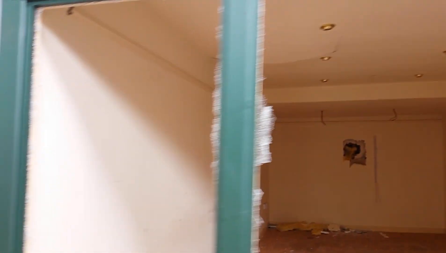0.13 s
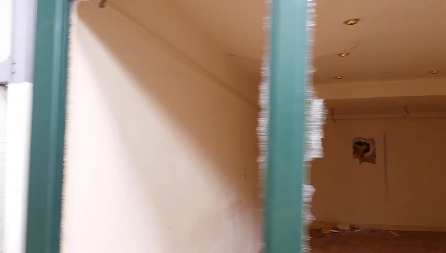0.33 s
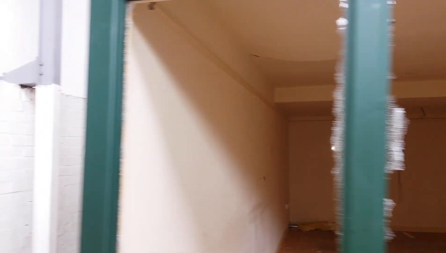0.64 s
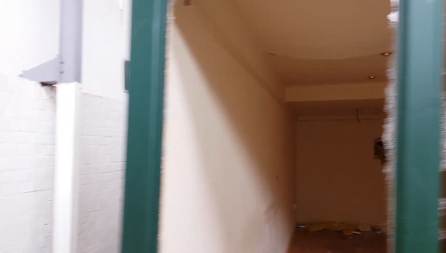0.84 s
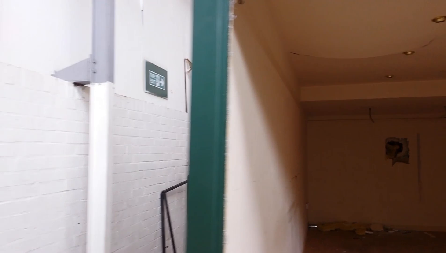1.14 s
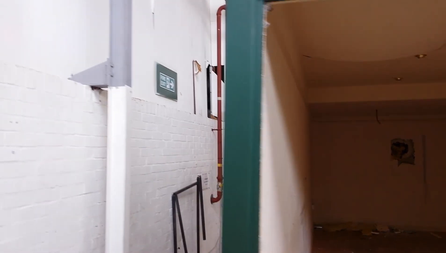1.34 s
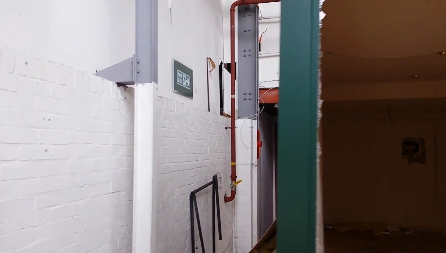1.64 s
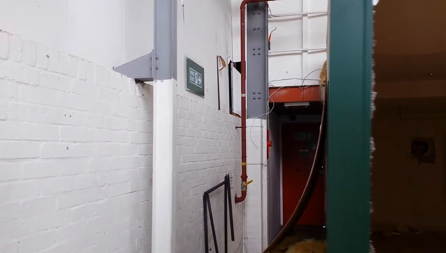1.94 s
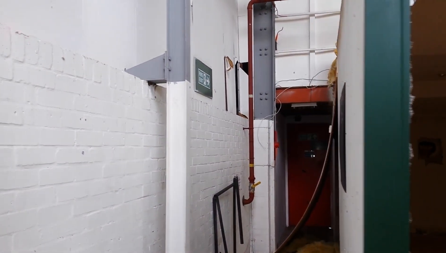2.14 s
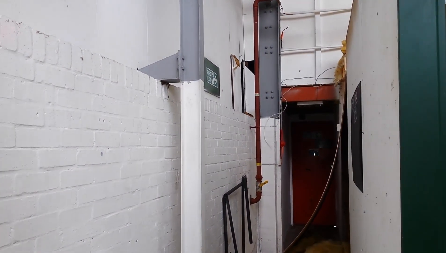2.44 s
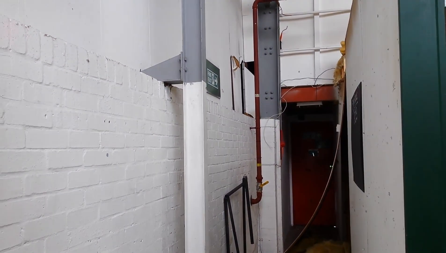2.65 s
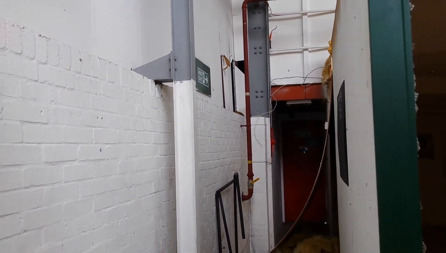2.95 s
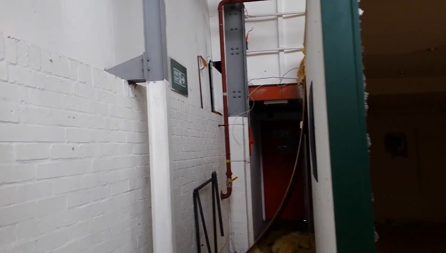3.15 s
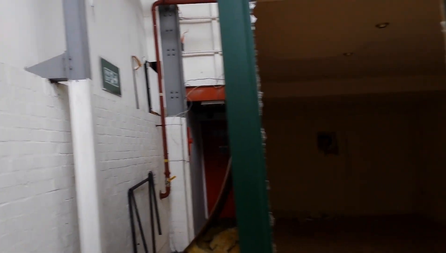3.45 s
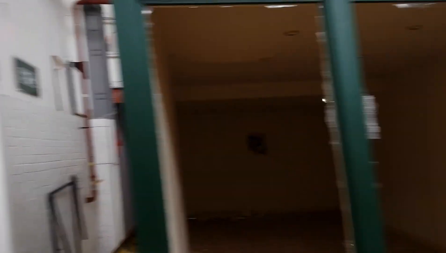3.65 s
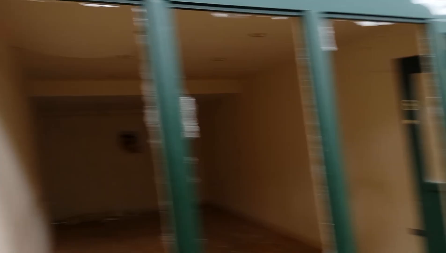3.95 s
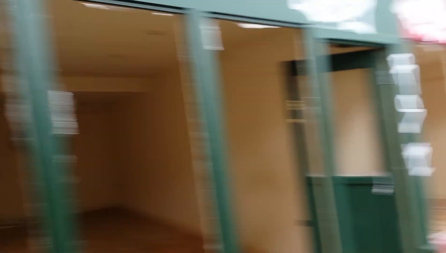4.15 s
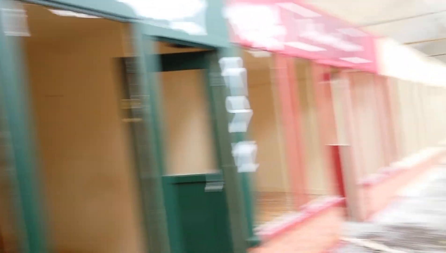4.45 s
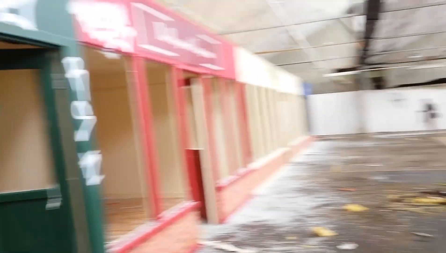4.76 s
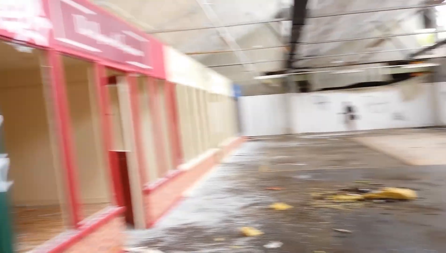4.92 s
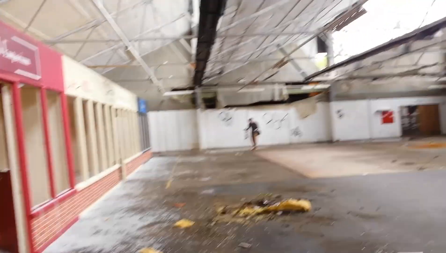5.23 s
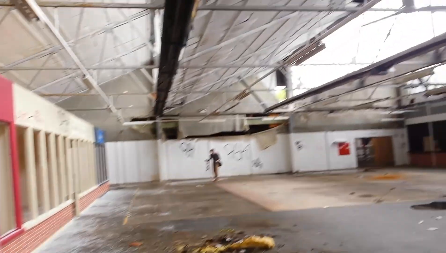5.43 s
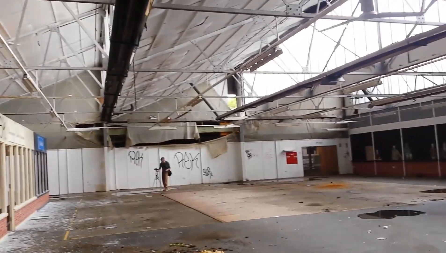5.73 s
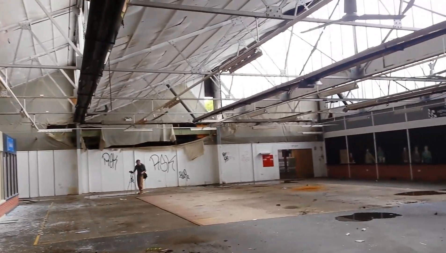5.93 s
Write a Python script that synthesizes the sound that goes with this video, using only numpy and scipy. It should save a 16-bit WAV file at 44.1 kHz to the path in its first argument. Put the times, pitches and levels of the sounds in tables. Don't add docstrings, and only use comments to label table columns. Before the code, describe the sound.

Someone walks slowly over grit and broken glass, heard from a handheld camera. Heavy crunching opens, a hollow heel thud with glassy ring follows, then grinding, a boomy step, two hard cracks, and a sparser ending of small clinks and ticks. The bare hall answers with a bright, diffuse echo over soft hiss and hand rumble.

```python
import sys
import numpy as np
from scipy import signal
from scipy.fft import rfft, irfft, next_fast_len
from scipy.io import wavfile
from scipy.ndimage import uniform_filter1d

SR = 44100
rng = np.random.default_rng(int(sys.argv[2]) if len(sys.argv) > 2 else 0)


def log_audio(samples):
    frames = np.atleast_2d(samples).T
    limited = np.clip(frames, -1, 1)
    pcm = np.round(limited * 32767).astype(np.int16)
    wavfile.write(sys.argv[1], SR, pcm)


def gain_from_db(level_db):
    decades = np.asarray(level_db, float) / 20
    return 10 ** decades


N = 268436
T = np.arange(N) / SR
STEP = 32

# [f/Hz, gain/dB, left minus right/dB]
PORTS = [(45, -16, -6), (103, 1.5, 0), (1000, -1, -2.5), (3200, 1.5, 1), (6770, 6, 1), (8000, -0.5, -7),
         (12800, -14, -9.5)]


def band(x, lo_hz, hi_hz):
    return signal.sosfilt(signal.butter(2, [lo_hz, min(hi_hz, 0.45 * SR)], "band", fs=SR, output="sos"), x)


def unit(x):
    return x / np.sqrt(np.mean(x ** 2))


def pair(n, like):
    mid, side = rng.standard_normal((2, n))
    like = np.clip(like, -0.15, 1)
    opposed = side * np.array([[1], [-1]])
    return (np.sqrt(1 + like) * mid + np.sqrt(1 - like) * opposed) / np.sqrt(2)


def shape(x, hz, db):
    size = next_fast_len(x.shape[-1])
    log_f = np.log(np.fft.rfftfreq(size, 1 / SR) + 1)
    gain = gain_from_db(np.interp(log_f, np.log(hz), db))
    return irfft(rfft(x, size) * gain, size)[..., :x.shape[-1]]


def add(out, s, sound):
    i = int(s * SR)
    out[:, i:i + sound.shape[-1]] += sound[..., :N - i]


def fade(t, t60):
    return np.exp(-np.log(1000) * t / np.maximum(t60, 0.004))


def load(s, held_s, rise_s, t60):
    t = T[::STEP]
    build = np.exp(np.minimum(t - s, 0) / max(rise_s, 0.001))
    return build * fade(np.maximum(t - s - held_s, 0), t60)


def hiss():
    # [f/Hz, level/dB per Hz]
    colour = [(26, -29), (45, -19), (87, 11.5), (222, 8), (500, 7.5), (1670, -4), (2660, -3), (4140, -5),
              (6440, 4), (9790, -11.5), (14900, -8), (16000, -20)]
    noise = unit(shape(pair(N, 0.49), *np.transpose(colour)))
    wander = np.repeat(rng.standard_normal(N // 4000 + 1), 4000)[:N]
    drift = uniform_filter1d(wander, size=4000)
    return gain_from_db(-54 + 0.5 * drift) * noise


def hand():
    # [firmest at t/s, held/s, level/dB]
    grips = [(.33, .5, -68), (1.1, .15, -70), (1.99, 0.022, -67), (2.299, 0.055, -74), (2.675, 0.032, -45),
             (3.159, 0.01, -42), (3.38, 0.15, -52), (3.59, 0.2, -41), (3.96, 0.0078, -45.5),
             (4.54, 0.11, -69), (5.15, 0.014, -48), (5.37, .03, -58), (5.59, .02, -66), (5.901, 0.12, -57)]
    grip = gain_from_db(-66)
    for s, held_s, db in grips:
        grip = grip + gain_from_db(db) * load(s, held_s, rise_s=0.035, t60=0.17)
    return np.repeat(grip, STEP)[:N] * unit(band(pair(N, 0.44), 42.7, 104.0))


def hall(dry):
    # [f/Hz, level/dB, t60/s]
    bands = [(166, -5, 0.96), (363, -3.5, 0.91), (698, -0.5, 1.0), (1310, -0.5, 0.91), (3200, 2, 0.85),
             (6500, 2, 0.8), (11200, 1.5, 0.51)]
    t, tail = T[:int(1.3 * SR)], 0
    hz = np.array(bands)[:, 0]
    edges = np.r_[60, np.sqrt(hz[1:] * hz[:-1]), 18000]
    for (centre_hz, db, t60), lo, hi in zip(bands, edges, edges[1:]):
        like = 1.05 - centre_hz / 1500
        noise = unit(band(pair(len(t), like), lo, hi)) * np.sqrt((hi - lo) / SR)
        tail = tail + gain_from_db(db) * noise * fade(t, t60) / np.sqrt(t60 * SR / 14)
    tail = tail * np.clip((t - 0.004) / 0.0069, 0, 1)
    return signal.fftconvolve(dry.mean(axis=0, keepdims=True), tail, axes=1)[:, :N]


def ring(modes, hits, level_db, damp, rise_s, loose=1):
    out = np.zeros((2, N))
    hz, db, t60 = np.transpose(modes)[:, :, None]
    t = T[:32000 if t60.max() > 1 else 12000]
    for s, peak_db in hits:
        chance = rng.standard_normal((3, len(hz), 1))
        jolts = np.repeat(rng.standard_normal((len(hz), len(t) // 400)), 400, axis=1)
        chatter = loose * uniform_filter1d(jolts, size=400)
        t = t[:chatter.shape[1]]
        envelope = fade(t, damp * t60) * (1 - np.exp(-t / rise_s))
        swell = gain_from_db(db + loose * chance[2] + 4.5 * chatter) * envelope
        spread = loose * np.minimum(hz / 1500, 1)
        for ch in range(2):
            tones = swell * np.sin(2 * np.pi * hz * t + spread * chance[ch] + 1.1 * chatter)
            add(out[ch:ch + 1], s, gain_from_db(peak_db + level_db) * tones.sum(axis=0))
    return out


def close_shards():
    # [f/Hz, level/dB, t60/s]
    shard, flake, sliver = [(2410, -15.5, .05), (2950, -15, 0.061), (4250, -14, 0.045), (4620, -7, 0.058),
                            (5250, -10, 0.05), (6780, -10.5, 0.12), (7400, -12, .07), (7970, -8, 0.12),
                            (9130, -9.5, 0.066), (10000, -5, .04), (10810, -3, .06), (12170, -2, .05),
                            (13200, 2, 0.03), (14770, 4, 0.027)], [(2970, -10, 0.061), (3500, -13, 0.08), (4360, -4, 0.043),
                                           (4660, -11, .07), (5300, -12, .1), (6498, -7, 0.022),
                                           (6850, -10.5, 0.16), (7687, -15, .08), (8500, 3, 0.056),
                                           (9200, -12, 0.079), (10400, 8, 0.028), (11740, -4, .06),
                                           (12100, -1, .07), (13450, -3, .053)], [(1000, -6, .05), (3354, -5, .05), (5330, -6, .07),
                                                          (6282, -4, .07), (7140, -4, .07), (9150, -7, .1),
                                                          (12300, -4, .08), (13400, -4, .08)]
    # [t/s, peak/dB]
    shard_hits = [
        (4.869, -20.5),
        (4.9, -26),
        (5.018, -21.5),
    ]
    flake_hits = [
        (4.9478, -18),
        (4.959, -25),
        (4.9798, -29),
    ]
    sliver_hits = [
        (2.936, -30.5),
        (2.9696, -42),
        (3.0114, -33.5),
        (3.028, -22),
        (3.1033, -48),
    ]
    return (ring(shard, shard_hits, level_db=-7.0, damp=0.86, rise_s=0.0023)
            + ring(flake, flake_hits, level_db=-11.0, damp=0.81, rise_s=0.003)
            + ring(sliver, sliver_hits, level_db=-8, damp=0.79, rise_s=0.0025))


def glass():
    # [f/Hz, level/dB, t60/s]
    pane, chip, tile = [(5389, -9, .22), (5460, -13, .2), (5534, -14, .55), (6142, -12, .14),
                        (6508, -12, .12), (7080, -16, .12), (7671, -9, .16), (7994, -8, .15),
                        (9884, -5, .14), (10260, -2, .14), (11070, -4, .12), (11890, 0, .15),
                        (13240, -1, .11), (14490, -1, .11)], [(5356, -9, .22), (6710, 0, .4), (7620, -9, .3)], [(1420, -6.5, 0.26), (1530, -3, 0.32), (1660, -7, 0.46),
                                                    (1790, -4.5, .25)]
    bead, frame = [(5430, -11, 0.054), (6320, -1, 0.056), (7300, 2, 0.074)], [(280, 6, 0.24), (383, 9, .2), (522, -7, 0.48), (1317, -2, 0.2),
                                 (1324, -24, 1.6), (1640, -7, 0.25), (2600, -13, 0.23)]
    # [t/s, peak/dB]
    pane_hits = [
        (1.0798, -31),
        (1.1118, -32),
    ]
    chip_hits = [
        (5.2325, -46),
        (5.381, -23.5),
        (5.445, -38),
    ]
    chip_tick = [
        (5.349, -30),
    ]
    tile_hits = [
        (3.404, -37.5),
        (3.591, -34),
        (3.755, -42.5),
    ]
    bead_hits = [
        (4.4242, -28.5),
    ]
    frame_hits = [
        (1.0839, -24),
    ]
    return (ring(pane, pane_hits, level_db=3.0, damp=1.0, rise_s=0.00026)
            + ring(chip, chip_hits, level_db=-8.5, damp=0.26, rise_s=0.0008)
            + ring(tile, tile_hits, level_db=0, damp=1, rise_s=0.0027)
            + ring(bead, bead_hits, level_db=-0.5, damp=0.45, rise_s=0.001)
            + ring(frame, frame_hits, level_db=0, damp=1, rise_s=0.004, loose=0.45)
            + ring(chip[:1], chip_tick, level_db=0, damp=0.4, rise_s=0.001))


def drags():
    # [full load at t/s, held/s, level/dB, f/Hz]
    slips = [
        (0.14, 0.097, -30.5, 270),
        (1.836, 0.05, -36, 320),
        (1.92, 0.054, -38, 324),
        (5.16, 0.057, -44, 286),
    ]
    out = 0
    for s, held_s, db, hz in slips:
        force = np.repeat(load(s, held_s, rise_s=0.0055, t60=0.068), STEP)[:N]
        out = out + gain_from_db(db) * force * unit(band(rng.standard_normal(N), 0.77 * hz, 1.36 * hz))
    return out


def grains(per_s, spread_db, lo_hz, hi_hz, like, smear_s, count):
    out, edges = 0, np.geomspace(lo_hz, hi_hz, count + 1)
    for lo, hi in zip(edges, edges[1:]):
        snaps = rng.random(N) < per_s / SR
        size = snaps * gain_from_db(spread_db * np.minimum(rng.exponential(size=N), 2.5))
        power = signal.lfilter([1], [1, -np.exp(-1 / (smear_s * SR))], size ** 2)
        out = out + band(np.sqrt(power) * pair(N, like), lo, hi)
    return unit(out)


def grind():
    # [full load at t/s, held/s, fine grit/dB, coarse grit/dB, sole scrape/dB]
    presses = [(0.0, 0.0049, -40, -48, -53), (0.164, 0.17, -25, -28, -35.5),
               (0.347, 0.0095, -26, -20.5, -29.5), (.492, 0.0057, -32, -47, -51),
               (.69, 0.16, -49.5, -48, -56.5), (1.006, 0.13, -37, -37.5, -41.5),
               (1.087, 0.047, -28.5, -30.5, -26), (1.872, 0.079, -24.5, -20.5, -31.5),
               (2.105, 0.12, -33, -34, -49), (2.21, 0.013, -41, -34.5, -41.5),
               (2.47, 0.11, -46.5, -45.5, -50.5), (2.669, 0.0079, -26, -34.5, -32),
               (2.93, 0.2, -45, -48.5, -60), (3.409, 0.0055, -28.5, -27.5, -33.5),
               (3.601, 0.025, -28, -27.5, -31.5), (3.75, 0.23, -45.5, -47, -77), (4.2, 0.15, -53, -56, -88),
               (4.426, 0.082, -34, -39, -44), (4.487, 0.0081, -32, -35, -60),
               (5.0, 0.12, -44.5, -51.5, -54), (5.106, 0.004, -57, -39.5, -53),
               (5.2, 0.18, -43, -44, -47.5), (5.524, 0.009, -39.5, -45.5, -50), (5.74, 0.05, -45, -46, -74),
               (5.9, 0.15, -43, -50.5, -49.5)]
    power = 0
    for s, held_s, *db in presses:
        rise_s = 0.0045 + 0.077 * held_s
        lift = load(s, held_s, rise_s, t60=0.21)
        settle = gain_from_db(-15) * load(s, held_s, rise_s, t60=1.0)
        power = power + (gain_from_db(np.array(db))[:, None] * (lift + settle)) ** 2
    fine, coarse, sole = np.repeat(np.sqrt(power), STEP, axis=1)[:, :N]
    dust = fine * gain_from_db(-5.5)
    return (dust * grains(150, spread_db=-7, lo_hz=11900, hi_hz=15400, like=0.05, smear_s=0.0055, count=2)
            + fine * grains(120, spread_db=4.5, lo_hz=3060, hi_hz=11960, like=0.027, smear_s=0.01, count=8)
            + coarse * grains(50, spread_db=5.0, lo_hz=960, hi_hz=3405, like=0.021, smear_s=0.012, count=5)
            + sole * grains(83, spread_db=-4.0, lo_hz=224, hi_hz=764, like=0.91, smear_s=0.0036, count=2))


def cracks(pieces, t60, crumbs_db, rise_s, fine_hz):
    coarse, fine, snap = np.zeros((3, 2, N))
    t = T[:4800]
    for s, peak_db, lean_db, hz in pieces:
        jumps = np.clip(rng.standard_normal(len(t) // 60), -2, 1.2)
        rattle = gain_from_db(1.28 + 2.56 * np.repeat(jumps, 60))
        decay = 0.18 * fade(t, 0.0076) + 0.5 * fade(t, t60)
        body = gain_from_db(peak_db + crumbs_db) * rattle * (1 - np.exp(-t / (rise_s + 0.0014))) * decay
        add(coarse, s - 0.0005, gain_from_db(min(lean_db, 0)) * body * pair(len(t), 0.069))
        add(fine, s - 0.0005, gain_from_db(min(-lean_db, 0)) * body * pair(len(t), 0.011))
        envelope = (1 - np.exp(-t / rise_s)) * fade(t, 0.005 + 12 / hz)
        lag_s = 1e-4 * rng.random((2, 1))
        add(snap, s, gain_from_db(peak_db - 6) * envelope * np.sin(2 * np.pi * hz * (t + lag_s)))
    return 1.365 * band(coarse, 597, 3250) + band(fine, *fine_hz) + snap


def ticks():
    # [t/s, peak/dB, coarse minus fine crumbs/dB, f/Hz]
    grit = [(2.4369, -33.5, 2, 785), (2.553, -26, -3, 880), (2.596, -29, 8, 990), (2.763, -31, 3, 2500),
            (2.7871, -27.5, -4, 6540), (2.83, -33, -2, 7000), (3.1040, -31.5, 4, 3200),
            (3.1493, -32, -17, 5600), (3.16, -32.5, -12, 8200), (4.266, -35, -12, 7200),
            (5.082, -36, -6, 5500), (5.112, -27.5, 5, 5540), (5.117, -37, 5, 4460), (5.19, -38, -10, 7540),
            (5.222, -27, -12, 5300), (5.237, -30, -15, 5460), (5.313, -30, -8, 7000), (5.57, -31, 1, 6500),
            (3.835, -30.5, -5, 5540), (3.965, -44, -3, 5000)]
    return cracks(grit, t60=0.044, crumbs_db=1.5, rise_s=0.0005, fine_hz=(4000, 9500))


def splinters():
    # [t/s, peak/dB, coarse minus fine crumbs/dB, f/Hz]
    snaps = [(1.0816, -16.5, -23, 1390), (1.325, -30, -4, 13000), (1.505, -34.5, 1.5, 10700),
             (2.4566, -29.5, -6.5, 6500), (2.5443, -29, -6, 5950), (2.6726, -21.5, 8, 5400),
             (2.9159, -35, 1, 7500), (2.9346, -30.5, 0, 6040), (3.0111, -39, -21, 6680),
             (3.0288, -29.5, 2, 5540), (3.1026, -35.5, -4, 6500), (3.7539, -22, -3, 7050),
             (4.077, -31.5, -1, 7500), (4.1485, -32.5, -10, 6860), (4.36, -38, -5.5, 6960),
             (4.8065, -32, -7, 5870), (4.870, -22, -6, 6990), (3.4058, -10.5, -23, 7260),
             (4.9476, -29.5, -5, 6850), (5.0191, -28, -22, 6800), (5.072, -28.5, -4, 5530),
             (5.103, -16.5, -40, 5400), (5.2607, -27.5, -21, 5950), (5.3001, -24, -2.5, 5300),
             (5.3492, -30.5, -4, 5000), (5.3827, -29, -2, 6900), (5.7235, -27, -4.5, 6500),
             (5.8621, -27.5, -6, 6600), (5.9236, -37, -11, 6900), (6.003, -30, -12, 7900)]
    return cracks(snaps, t60=0.044, crumbs_db=5, rise_s=0.00042, fine_hz=(4900, 19000))


def lumps():
    # [t/s, peak/dB, coarse minus fine crumbs/dB, f/Hz]
    breaks = [(0.1268, -25, 4, 3680), (0.2894, -6, 22, 1450), (0.3019, -3, 19, 1420), (0.3304, -4, 6, 1390),
              (.3345, -7.5, 5, 3480), (.1343, -20.5, 1, 3200), (.1533, -24, 0, 5560), (.346, -20, 10, 1500),
              (.352, -5, 3, 2110), (.358, -6.5, 6, 3650), (.366, -7.5, -7, 5640), (.373, -9, 3, 3600),
              (.381, -9, 7, 2200), (.392, -15.5, -7, 3550), (.495, -12.5, -20, 6100),
              (1.8313, -26.5, 2, 1135), (1.8832, -6, 1, 3400), (1.9131, -13, 2, 3130),
              (1.922, -11, -7, 6500), (2.199, -14.5, -6, 6500), (2.219, -9.5, -3, 6340),
              (2.228, -20, 9, 837), (0.4881, -15.5, -2.5, 1310), (0.689, -20.5, 4, 1480),
              (1.0004, -19, 5, 1250), (1.8403, -20, 3, 1060), (1.8708, -7, 27, 980),
              (1.937, -3, -3.5, 3960), (2.0684, -19.5, 9, 1120), (2.1017, -9.5, 9, 1080),
              (2.1586, -14, 16, 1120), (2.128, -20.5, 9, 810), (2.181, -21, 16, 810),
              (2.2091, -12.5, 10, 1020), (2.3545, -26.5, 1, 1790), (2.4972, -28, -3, 840),
              (3.4035, -7.5, 9, 1660), (3.5912, -4, 4.5, 2080), (4.4237, -11.5, 0, 5340),
              (4.7885, -33, -4, 2500), (5.156, -27, 7, 2840), (5.227, -20, 9, 970), (5.5216, -21, 22, 2960),
              (5.7578, -30, 15, 7900), (5.7702, -21, 1.5, 6000), (5.962, -27, 1, 2950),
              (0.1467, -13, -5, 5400), (0.2403, -12, -11, 6500), (2.656, -24, 1, 5700),
              (4.4833, -21, -9, 950)]
    return cracks(breaks, t60=0.047, crumbs_db=-3, rise_s=0.00027, fine_hz=(3600, 10000))


def thuds():
    # [t/s, peak/dB, f/Hz, knock minus peak/dB]
    blows = [(0.127, -29.5, 223, 1.5), (0.152, -23, 242, -17), (0.177, -22, 299, -28), (0.2, -40, 256, -8),
             (0.226, -16, 296, -21), (0.248, -28.5, 196, -19), (1.074, -23.5, 320, -4),
             (1.0782, -21, 369, -25), (1.0805, -2.5, 362, -16), (1.107, -22, 417, -9),
             (1.114, -13.5, 312, -20), (1.13, -15, 476, -25), (1.49, -30.5, 430, -20),
             (1.845, -28, 364, -8), (1.867, -19.5, 318, -27), (1.932, -26.5, 315, 5.5),
             (1.965, -21.5, 324, -5), (2.096, -34, 513, -10), (2.672, -9.5, 361, -30),
             (2.709, -20.5, 257, -23), (3.4, -23.5, 386, -33), (3.588, -16.5, 422, -15),
             (3.751, -18.5, 375, -10.5), (3.818, -37, 350, -15), (4.414, -30, 288, -15),
             (4.426, -26, 280, -21), (4.53, -31, 305, -26), (5.154, -20, 276, -31), (5.226, -27.5, 279, 3),
             (5.346, -18.5, 309, -31), (5.381, -27, 254, -23), (5.881, -30, 181.6, -36)]
    # [t/s, peak/dB]
    booms = [(0.153, -32), (1.079, -26), (1.111, -28.5), (1.845, -35), (1.868, -31), (1.966, -29.5),
             (2.673, -20.5), (2.709, -30), (4.426, -42), (5.154, -39), (5.382, -35), (5.883, -46)]
    # [t/s, cycles in which the hollow note dies]
    ground = [(0, 14.3), (1.08, 17), (1.12, 22.4), (1.9, 18.7), (2.67, 7.3), (3.75, 9.8), (4.4, 10),
              (5.35, 15.2), (5.9, 29)]
    out, t = np.zeros((2, N)), T[:14000]
    rise = 1 - np.exp(-t / 0.0011)
    for s, peak_db, hz, knock_db in blows:
        phase = 2 * np.pi * rng.random(3)
        t60 = np.interp(s, *np.transpose(ground)) / hz

        def tone(ratio, k):
            return np.sin(2 * np.pi * ratio * hz * t + phase[k])

        note = np.sin(2 * np.pi * hz * t) + 0.44 * tone(0.82, 0) + 0.53 * tone(1.382, 1)
        knock = gain_from_db(knock_db) * (tone(2.0, 2) + tone(2.34, 1)) * fade(t, 0.5 * t60)
        add(out, s + 0.00203, gain_from_db(peak_db) * (note * fade(t, t60) + knock) * rise)
    boom = np.sin(2 * np.pi * 146.8 * t) * fade(t, 0.075) * rise
    for s, peak_db in booms:
        add(out, s + 0.0019, gain_from_db(peak_db) * boom)
    return out


def scene():
    # [t/s, left minus right/dB]
    turn = [
        (0, 2.5),
        (1.2, -1.5),
        (2.5, 1),
        (4.3, -2),
        (6.1, -1),
    ]
    shards = close_shards()
    steps = gain_from_db(-6.0) * grind() + lumps() + thuds() + drags() + ticks() + splinters() + glass()
    pan_db = np.interp(T, *np.transpose(turn))
    heard = steps + shards + hall(steps + 0.5 * shards)
    heard = heard * gain_from_db(np.array([pan_db, -pan_db]) / 2)
    hz, gain_db, _ = np.transpose(PORTS)
    return shape(heard, hz, gain_db) + hand() + hiss()


def low_pass(x):
    return signal.sosfilt(signal.butter(12, 16480, fs=SR, output="sos"), x)


def record(dry):
    hz, _, pan_db = np.transpose(PORTS)
    ports = np.array([shape(dry[0], hz, pan_db / 2), shape(dry[1], hz, -pan_db / 2)])
    ports = signal.sosfilt(signal.ellip(8, 0.2, 60, 15650, fs=SR, output="sos"), ports)
    return low_pass(ports)


dry = scene()
out = record(dry)
log_audio(out)
```